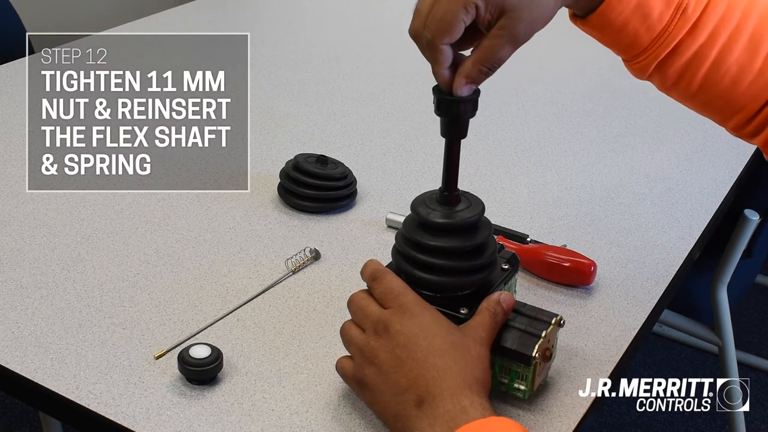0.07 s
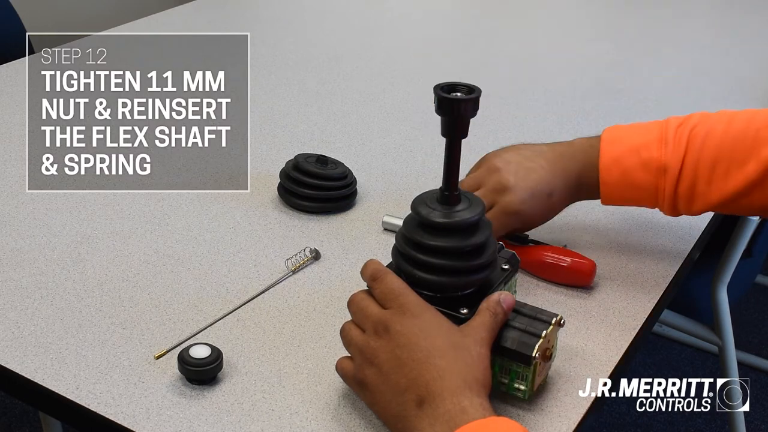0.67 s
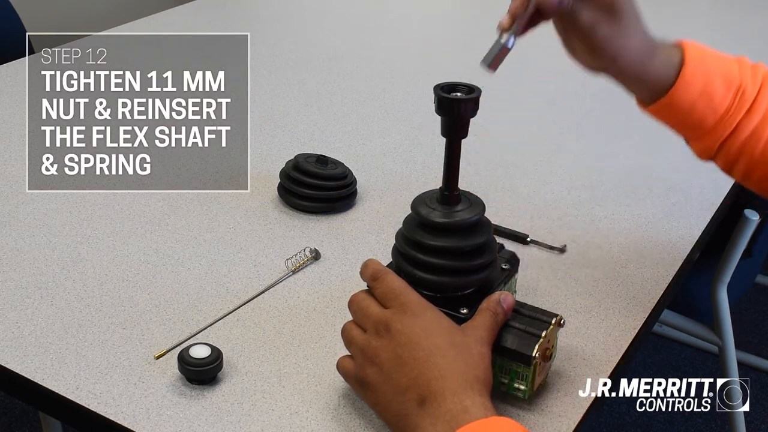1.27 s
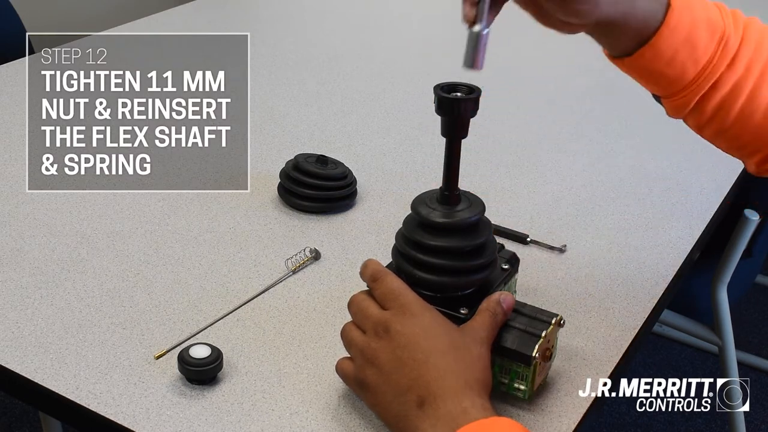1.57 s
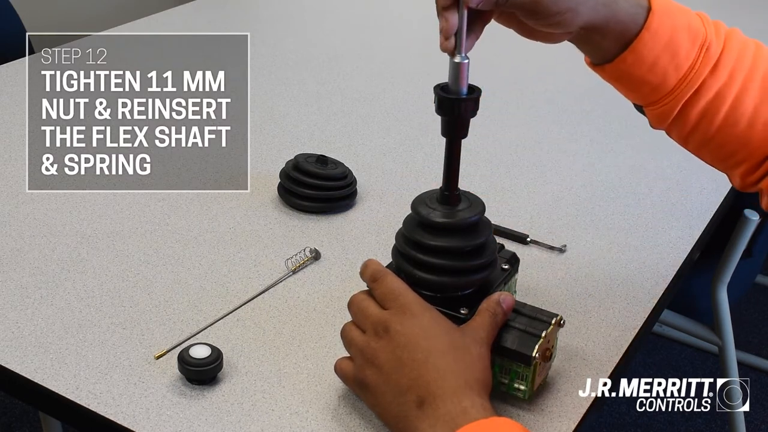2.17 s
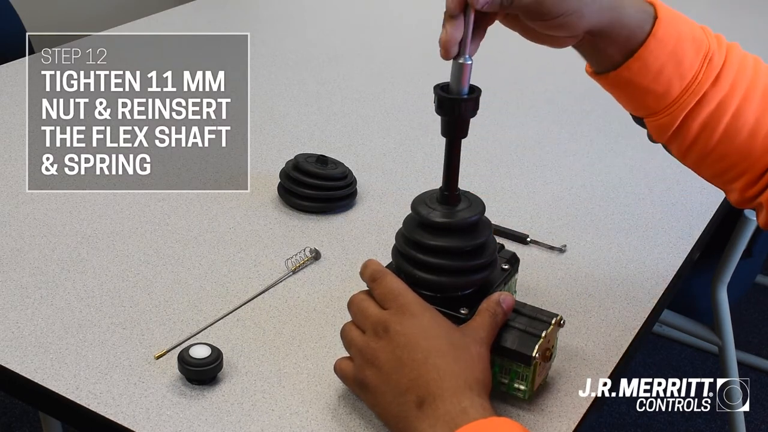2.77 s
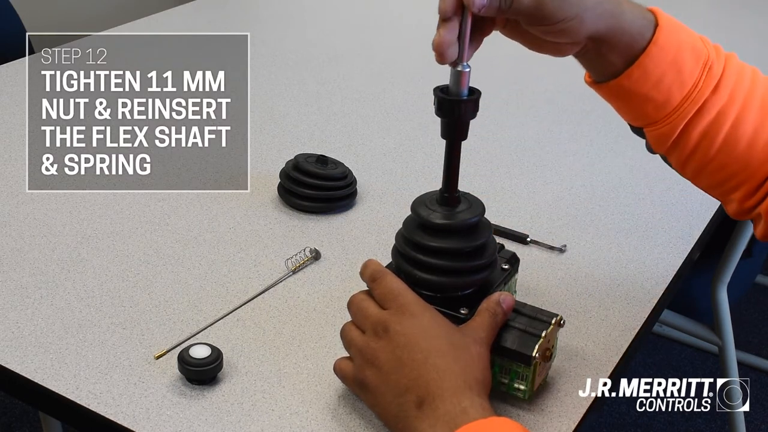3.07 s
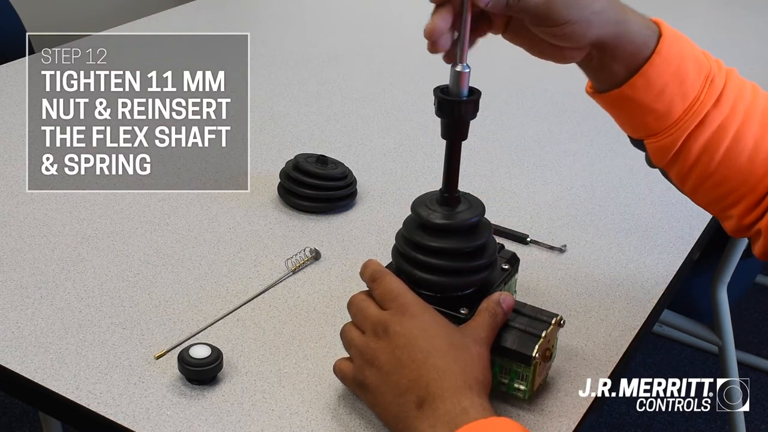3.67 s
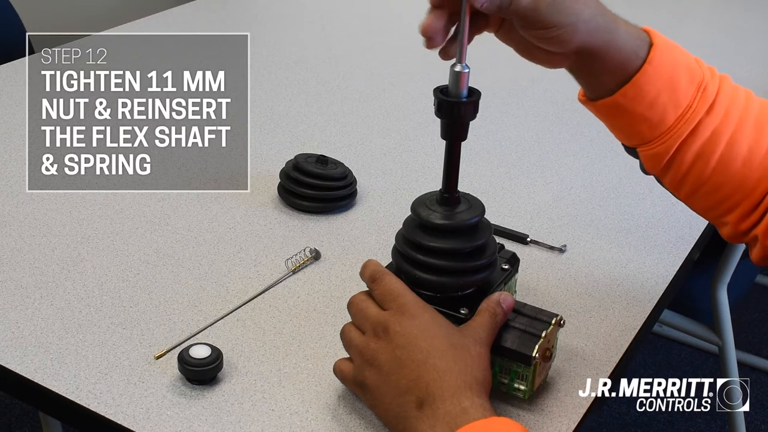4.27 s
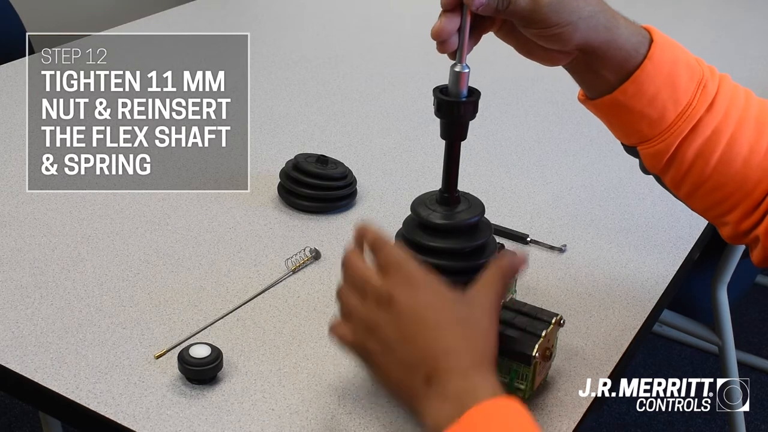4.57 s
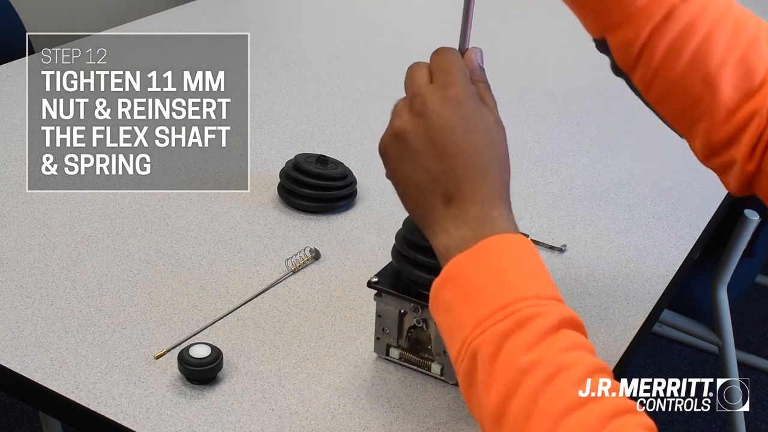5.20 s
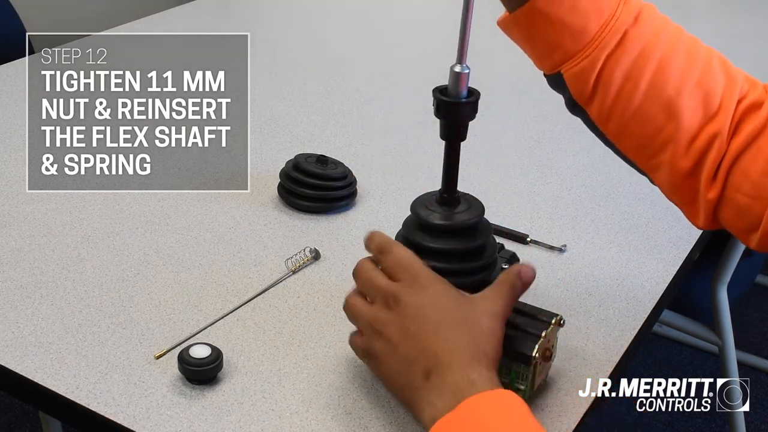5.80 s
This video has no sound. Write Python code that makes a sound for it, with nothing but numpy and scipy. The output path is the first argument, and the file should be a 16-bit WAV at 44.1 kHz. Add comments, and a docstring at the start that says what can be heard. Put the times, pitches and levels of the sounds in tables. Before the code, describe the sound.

Sharp metal clicks, dull knocks and faint gritty scrapes of a nut driver being fitted and twisted, with ventilation humming indoors.

```python
"""Fingers brush a nut driver over a low ventilation hum, close to the microphone in a small room.
The driver judders across the table in stick-slip jerks, knocks onto the shaft of a control handle
and is turned. Its steel socket rubs, ticks and drops over the nut with a double clack; the housing
and table top boom under it, and a fingertip creaks. The handling sits in the centre, answered by
the room, over a faint steady background hiss."""
import sys
import numpy as np
from scipy import signal
from scipy.fft import rfft, irfft, next_fast_len
from scipy.io import wavfile
from scipy.ndimage import map_coordinates

SR = 44100
rng = np.random.default_rng(int(sys.argv[2]) if len(sys.argv) > 2 else 0)


def dump(signal):
    """Clip the signal to [-1, 1] and save it as 16-bit WAV at the path in sys.argv[1]."""
    limited = np.clip(np.atleast_2d(signal).T, -1, 1)
    pcm = np.round(limited * 32767).astype(np.int16)
    wavfile.write(sys.argv[1], SR, pcm)


N = 266408


def amp(db):
    """Decibels to gain."""
    return 10 ** (np.asarray(db) / 20)


def unit(x):
    """x at rms 1."""
    return x / np.sqrt(np.mean(x ** 2) + 1e-20)


def along(points, hz):
    """(Hz, value) points read on a log axis."""
    f, v = np.transpose(points)
    return np.interp(np.log(hz + 1), np.log(f + 1), v)


def wobble(rate):
    """A smooth random curve, rate knots a second."""
    return map_coordinates(rng.standard_normal(int(N * rate / SR) + 4), [np.arange(N) * rate / SR])


def filtered(x, response):
    """x times a response of frequency."""
    n = x.shape[-1]
    m = 2 * next_fast_len(n // 2 + SR // 8)
    return irfft(rfft(x, m) * response(np.fft.rfftfreq(m, 1 / SR)), m)[..., :n]


def causal(gain):
    """The minimum-phase response with this gain: nothing sounds before the blow."""
    cepstrum = irfft(np.log(np.maximum(gain, 1e-6)))
    half = len(cepstrum) // 2
    cepstrum[1:half] *= 2
    cepstrum[half + 1:] = 0
    return np.exp(rfft(cepstrum))


def coloured(x, points):
    """x through a causal (Hz, dB) colour."""
    return filtered(x, lambda hz: causal(amp(along(points, hz))))


def resonances(modes, hz):
    """The response of a body with (Hz, width Hz, dB) modes of alternating sign."""
    return sum((-1) ** k * amp(db) * 1j * hz * width / (centre ** 2 - hz ** 2 + 1j * hz * width)
               for k, (centre, width, db) in enumerate(modes))


def ring(modes, t):
    """Damped (Hz, dB, t60 s) modes, struck at slightly new strengths each time."""
    hz, db, t60 = np.transpose(modes)[:, :, None]
    strength_db = db + 2 * rng.standard_normal(db.shape)
    sign = rng.choice([-1, 1], db.shape)
    return np.sum(sign * amp(strength_db - 60 * t / t60) * np.sin(2 * np.pi * hz * t), 0)


def slips(rate, spread_db):
    """Tiny random impulses of uneven size, rate a second."""
    impulses = (rng.random(N) < rate / SR) * rng.choice([-1, 1], N)
    return impulses * amp(spread_db * rng.standard_normal(N))


def stroke(start, hold_s, rise_s, fall_s):
    """Gain of one hand movement: it swells, holds at 1 and fades; rise and fall are times for 20 dB."""
    t = np.arange(N) / SR - start
    return 10 ** -np.minimum(np.maximum(-t, 0) / rise_s + np.maximum(t - hold_s, 0) / fall_s, 10)


def strokes(rows, rise_s, fall_s):
    """Gain of a series of (start s, hold s, dB) movements."""
    return np.max([amp(db) * stroke(start, hold_s, rise_s, fall_s) for start, hold_s, db in rows], 0)


def add(track, s, sound):
    """Mix a sound into the track at time s."""
    part = track[round(s * SR):][:len(sound)]
    part += sound[:len(part)]


# Fingers and sleeve on the tool, close up. Each row: start and hold in seconds, relative level in dB.
TOUCHES = [(0, 0.039, -54.5), (.13, 0.1, -58), (4.78, 0.056, -62.5), (5.47, .09, -55), (5.83, 0.033, -61)]
# The colour of rubbing skin. Each row: frequency in Hz, gain in dB.
SKIN_COLOUR = [(150, 7), (400, 5), (1200, -5.5), (2000, -5.5), (2700, -3.5), (3600, -5.5), (4600, -24.5),
               (9000, -27), (16000, -43)]

def brushing():
    """Fingers and cloth slide over the tool in faint dry grains."""
    touch = strokes(TOUCHES, rise_s=0.072, fall_s=0.055)
    grains = unit(coloured(slips(rate=790, spread_db=1.5), SKIN_COLOUR))
    return in_room(amp(2.5) * touch * grains, room_db=-3.0)


# Fan and mains behind the scene. Each row: frequency in Hz, rms level in dB, waver in dB.
HUM_TONES = [(28.7, -42.5, 0), (59.1, -51, 1), (119.7, -47.5, 2), (208, -64.5, 0.5)]
# The duct's rumble. Each row: frequency in Hz, gain in dB.
DUCT_COLOUR = [(10, -9.5), (28, 6), (42, -10.5), (62, 3.5), (80, -8.5), (130, -7), (200, -18), (300, -17),
               (600, -51.5)]

def ventilation():
    """A fan and the mains hum over a duct rumble."""
    hum, t = np.zeros(N), np.arange(N) / SR
    for hz, db, waver_db in HUM_TONES:
        peak = np.sqrt(2) * amp(db + waver_db * wobble(4.0))
        drift = 0.027 * waver_db * wobble(3.2)
        hum += peak * np.sin(2 * np.pi * hz * t + drift)
    rumble = amp(-45) * unit(coloured(rng.standard_normal(N), DUCT_COLOUR))
    return hum + rumble


# The background hiss. Each row: frequency in Hz, gain in dB.
HISS_COLOUR = [(88, -37), (150, -7.5), (201, -0.5), (315, -12.5), (447, -15.5), (483, -11), (532, -18.5),
               (901, -19.5), (974, -19.5), (1210, -22.5), (15800, -28)]
# How alike it is left and right. Each row: frequency in Hz, likeness from 0 to 1.
HISS_LIKENESS = [(60, 1.0), (240, 1.0), (950, 0.9), (3770, 0.47), (15000, 0.026)]

def hiss():
    """A faint steady background hiss, less alike between left and right in the treble."""
    def mid_side_gains(hz):
        angle = np.arccos(np.clip(along(HISS_LIKENESS, hz), -1, 1)) / 2
        return amp(along(HISS_COLOUR, hz)) * [np.cos(angle), np.sin(angle)]

    mid, side = filtered(rng.standard_normal((2, N)), mid_side_gains)
    return amp(-55) * unit(np.array([mid + side, mid - side]))


# The small room around the table. Each row: frequency in Hz, time to fade by 60 dB (t60) in seconds.
ROOM_DECAY = [(100, 0.79), (400, 0.49), (1200, 0.19), (4000, 0.34), (13000, 0.22)]
# Its answer at the microphone. Each row: frequency in Hz, gain in dB.
ROOM_COLOUR = [(100, 0), (400, 0.5), (1500, -2.5), (3800, -5.5), (7000, -7.5), (14000, -8.5)]

def room(x):
    """A fresh room answer to x: quick echoes off table and body, then the walls' tail."""
    hz, t, noise = signal.stft(rng.standard_normal(SR // 2), SR, nperseg=256)
    walls = amp(-60 * t / along(ROOM_DECAY, hz)[:, None])
    early = amp(-9 - 60 * t / 0.056)
    tail = signal.istft(noise * (walls + early), SR, nperseg=256)[1]
    tail = np.pad(tail, (SR // 300, 0))  # the first echo comes about 3 ms late
    return signal.fftconvolve(x, coloured(tail / np.linalg.norm(tail), ROOM_COLOUR))[:len(x)]


def in_room(x, room_db):
    """x with the room's answer."""
    return x + amp(room_db) * room(x)


# Squeaky slips of socket and fingertips. Each row: start in seconds, peak in dB, pitch in Hz.
SQUEAKS = [(.026, -46, 2920), (.047, -44, 3240), (.125, -44, 3320), (.183, -47, 2770), (2.499, -41, 3230),
           (2.514, -43, 2850), (2.568, -45, 2710), (2.619, -44, 2550), (2.774, -44, 3240),
           (2.832, -44, 2710), (2.89, -42, 2310), (3.767, -35, 3150), (5.577, -46, 2850)]

def squeaks():
    """A brief slip squeals in a rough narrow band for a few milliseconds."""
    track, t = np.zeros(N), np.arange(SR // 20) / SR
    peak_s = 0.0015
    envelope = t / peak_s * np.exp(1 - t / peak_s)
    for s, db, hz in SQUEAKS:
        roughness = np.cumsum(0.3 * rng.standard_normal(len(t)))
        add(track, s, amp(db) * envelope * np.sin(2 * np.pi * hz * t + roughness))
    return in_room(track, room_db=-5)


# The driver's handle jerks over the table, then its steel end follows.
# Each row: start and hold in seconds, relative force in dB.
HANDLE_JERKS = [(.655, .028, -29.5), (.701, 0.012, -24.5), (.745, 0.028, -36.5)]
STEEL_END_JERKS = [(.785, 0.057, -38.5), (.851, .035, -30.5)]
# How each of them resonates on the table. Each row: frequency and width in Hz, gain in dB.
HANDLE_MODES = [(310, 83, -7.5), (481, 33, -4), (720, 37, -4.5), (840, 30, -4), (1000, 100, -5),
                (1064, 31, -3), (1150, 55, -9), (1540, 140, -16), (1727, 12, -10.5), (1864, 25, -8),
                (2180, 370, -22.5)]
STEEL_END_MODES = [(253, 46, -2.5), (368, 68, -2.5), (641, 27, -1), (790, 11.5, 1.5), (878, 27, -2.5),
                   (1040, 24, -10), (1340, 260, -18.5), (1830, 47, -31)]

def drag():
    """The handle, then the steel end, stick and slip over the table, each with its own modes."""
    sound = np.zeros(N)
    for jerks, modes in ((HANDLE_JERKS, HANDLE_MODES), (STEEL_END_JERKS, STEEL_END_MODES)):
        judder = unit(slips(rate=2000, spread_db=1.0)) * strokes(jerks, rise_s=0.016, fall_s=0.029)
        sound += filtered(judder, lambda hz: resonances(modes, hz) * causal(1 / (1 + (hz / 2900) ** 6)))
    return in_room(amp(19.5) * sound, room_db=-4.0)


def chatter():
    """As the handle starts to slide, the table hums at the rate of its slips, sagging as the push ends."""
    start_s, hold_s, slip_hz, sag_hz_per_s = 0.653, 0.052, 329, 2000
    slowing_s = np.maximum(np.arange(N) / SR - start_s - hold_s, 0)
    rate = np.maximum(slip_hz - sag_hz_per_s * slowing_s, 0)
    push = amp(-30) * stroke(start_s, hold_s, rise_s=0.022, fall_s=0.061)
    return in_room(push * np.sin(2 * np.pi * np.cumsum(rate) / SR), room_db=-8.5)


# Steel contacts just in front of the microphone.
# Each row: start in seconds, then level, brightness and the socket's ring, all in relative dB.
CONTACTS = [(1.7802, -24.5, -9.5, -28), (1.981, -34.5, -18, -18), (1.9871, -32, -13, -20),
            (2.004, -32, -18, -20), (2.033, -37.5, -15, -22), (2.642, -18.5, -14.5, 0),
            (2.9452, -28, -18, -17), (2.9725, -7.5, -11.5, -11), (2.996, -16.5, -12, -16),
            (2.9987, -9.5, -9.5, -56), (3.001, -30, -15, -24), (3.505, -35.5, -12, -15),
            (3.538, -31.5, -5, -30), (3.768, -34, -22, -24), (3.8865, -31.5, 7, -24),
            (4.09, -38.5, -21, -37), (4.379, -37, -48, -22)]
# The colour of the crack. Each row: frequency in Hz, gain in dB.
CRACK_COLOUR = [(300, -7), (1200, -3.5), (2400, -8.5), (3000, 1.5), (3900, 1), (4700, -6.5), (6000, -3),
                (8500, -9), (11000, -6.5), (12500, -1.5), (14000, -18), (16000, -10)]
# The steel socket, damped by the fingers. Each row: frequency in Hz, relative level in dB, t60 in seconds.
SOCKET_MODES = [(3450, 10, 0.054), (3950, 12, 0.021), (5700, 8, 0.022), (5230, -12, .016),
                (6930, 27.5, 0.0064), (13300, -4, .014)]

def clicks():
    """Steel meets steel: a gritty crack; the socket rings most when it is loose on the nut."""
    track, t = np.zeros(N), np.arange(SR // 2) / SR
    burst = (1 - np.exp(-t / 0.0016)) * amp(-60 * t / 0.012)
    impulse = 1.0 * (t == 0)
    for s, db, bright_db, ring_db in CONTACTS:
        grit = unit(rng.standard_normal(len(t)) * burst)
        # the walls hear the crack from every side, so their answer is even in colour
        walls = amp(-0.5) * room(unit(impulse))
        crack = unit(coloured(grit + walls, CRACK_COLOUR))
        socket = amp(ring_db - 4.5) * unit(in_room(ring(SOCKET_MODES, t), room_db=-14))
        click = coloured(crack + socket, [(4500, 0), (9000, bright_db + 9.0)])
        add(track, s, amp(db - 31.0) * unit(click))
    return track


# The driver's steel shaft. Each row: frequency and width in Hz, gain in dB.
SHAFT_MODES = [(3570, 43, 4), (3870, 63, 2), (3900, 70, -6)]

def shaft(steel):
    """Shaken by the steel contacts, the shaft sings; it reaches the microphone by way of the room."""
    return amp(-0.5) * room(filtered(steel, lambda hz: resonances(SHAFT_MODES, hz)))


# Blows that reach the table through the housing. Each row: start in seconds, relative level in dB,
# hardness as a treble cutoff in Hz, ring of the control handle in relative dB.
BLOWS = [(1.782, -21, 1600, -28), (2.645, -41, 604, -6), (2.975, -16.5, 335, -19),
         (3.003, -23.5, 1090, -23), (4.164, -38.5, 1410, -25), (4.376, -40.5, 1410, -4),
         (4.467, -44, 900, -9), (5.005, -52, 450, 12), (5.059, -51, 980, -3)]
# The colour of the thud. Each row: frequency in Hz, gain in dB.
THUD_COLOUR = [(40, -39.5), (110, -4.5), (200, -1), (450, 0), (750, -1), (1100, -10), (1500, -11),
               (1850, -16.5), (4000, -14.5), (9000, -97)]
# The housing on the table top, and the control handle's hollow note.
# Each row: frequency in Hz, relative level in dB, t60 in seconds.
HOUSING_MODES = [(161, -37, 0.055), (206.3, 0.5, 0.2), (254.8, 1.5, 0.22), (277, -8.5, 0.11),
                 (336.5, -10, 0.092), (384, -7, 0.24), (433.6, -3, 0.11), (457, -8, 0.67), (587, -42, 0.22),
                 (685.7, -4, 0.22), (724, -12, 0.22), (791, -11.5, 0.34), (1006, -11.5, 0.23),
                 (1228, -17, 0.29), (1628, -6, 0.1)]
CONTROL_MODES = [(450, 0, 0.33)]

def knocks():
    """Blows run down the shaft and boom in housing and table; soft ones stay low."""
    track, t = np.zeros(N), np.arange(SR // 2) / SR
    impulse = 1.0 * (t == 0)
    for s, db, hard_hz, ring_db in BLOWS:
        thud = unit(coloured(in_room(impulse, room_db=3.5), THUD_COLOUR))
        housing = amp(-0.5) * unit(ring(HOUSING_MODES, t))
        control = amp(ring_db) * unit(ring(CONTROL_MODES, t))
        boom = filtered(thud + housing + control, lambda hz: causal((1 + (hz / hard_hz) ** 4) ** -0.5))
        add(track, s, amp(db - 11.0) * unit(boom))
    return track


# Twists of the socket on the nut, at close range.
# Each row: start and hold in seconds, then pressure and scrape in relative dB.
TWISTS = [(1.983, 0.044, -42.5, -48.5), (2.284, .08, -45, -62), (2.391, 0.052, -35.5, -53),
          (2.495, 0.033, -39, -54.5), (2.625, .06, -50, -65), (2.795, 0.11, -40.5, -62),
          (2.951, 0.028, -36, -42), (3.137, 0.063, -37, -42.5), (3.501, 0.068, -36.5, -46.5),
          (3.797, 0.032, -40.5, -48), (3.881, .05, -37.5, -47), (4.158, 0.023, -38.5, -51.5)]
# The colours of the low grind and the high scrape. Each row: frequency in Hz, gain in dB.
GRIND_COLOUR = [(120, -9), (200, 4.5), (400, 3), (560, -6.5), (750, -0.5), (1000, -8), (1300, -24.5),
                (2000, -11), (4000, -48.5)]
SCRAPE_COLOUR = [(500, -8), (1200, 2), (2000, 2), (3200, 3.5), (3950, 3.5), (4600, -9), (7000, -14.5),
                 (12500, -15.5), (16000, -46)]

def turning():
    """Each twist rubs steel on steel: a gritty scrape above, a grind in the housing's low modes below."""
    lag_s = 0.01  # the housing takes the load just after the steel bites
    pressure = strokes([(s + lag_s, hold, db) for s, hold, db, _ in TWISTS], rise_s=0.065, fall_s=0.11)
    bite = strokes([(s, hold, db) for s, hold, _, db in TWISTS], rise_s=0.038, fall_s=0.061)
    modes = [(hz, np.log(1000) / np.pi / t60, db) for hz, db, t60 in HOUSING_MODES]  # t60 to width
    friction = slips(rate=1500, spread_db=5.5)
    hollow = unit(filtered(friction, lambda hz: resonances(modes, hz) * hz / (1 + (hz / 850) ** 6)))
    grit = unit(coloured(slips(rate=1600, spread_db=3.5), GRIND_COLOUR))
    grind = pressure * unit(grit + amp(-4) * hollow)
    scrape = bite * unit(coloured(slips(rate=1300, spread_db=1.0), SCRAPE_COLOUR))
    return in_room(amp(-2.5) * grind + amp(-2.0) * scrape, room_db=-6.0)


# The resonances of a fingertip creaking on the tool. Each row: frequency and width in Hz, gain in dB.
CREAK_MODES = [(1900, 160, -1), (2450, 53, 5), (2750, 130, -2), (3770, 270, -9)]

def creak():
    """Skin slips faster and louder until the finger lets go."""
    start_s, hold_s, slip_hz, doubling_s = 4.57, 0.026, 158, 0.019
    elapsed = np.minimum(np.arange(N) / SR - start_s, hold_s)
    rate = slip_hz * 2 ** (elapsed / doubling_s)
    pulses = np.diff(np.floor(np.cumsum(rate) / SR), prepend=0)
    force = amp(-16) * stroke(start_s, hold_s, rise_s=0.028, fall_s=0.004)
    return in_room(force * filtered(pulses, lambda hz: resonances(CREAK_MODES, hz)), room_db=-6.5)


def scene():
    """All the handling sits in front of the microphone, over the hum and the hiss."""
    steel = clicks() + turning()
    tool = steel + shaft(steel) + drag() + chatter() + knocks()
    return tool + squeaks() + creak() + brushing() + ventilation() + hiss()


def record(dry):
    """The camera keeps nothing above its band limit."""
    top_hz = 15950
    return filtered(dry, lambda hz: hz < top_hz)


dry = scene()
out = record(dry)
dump(out)
```